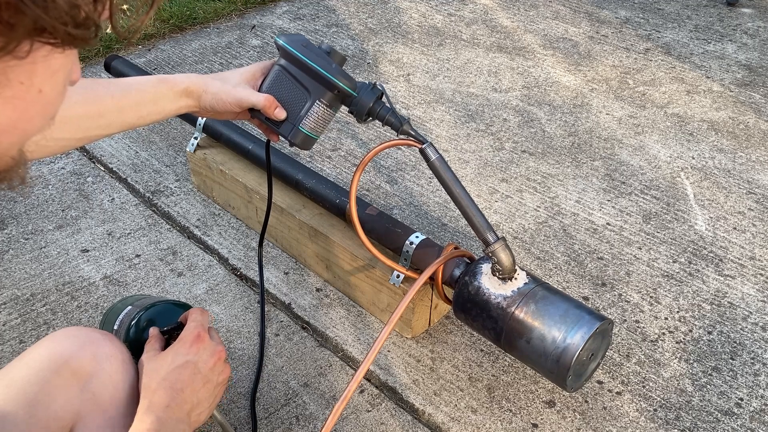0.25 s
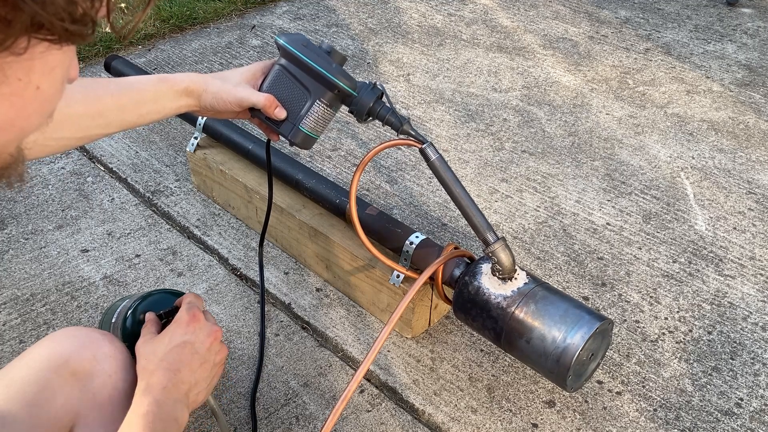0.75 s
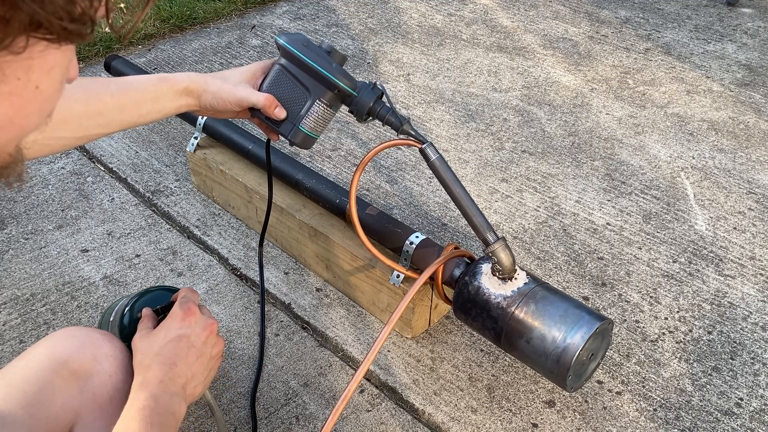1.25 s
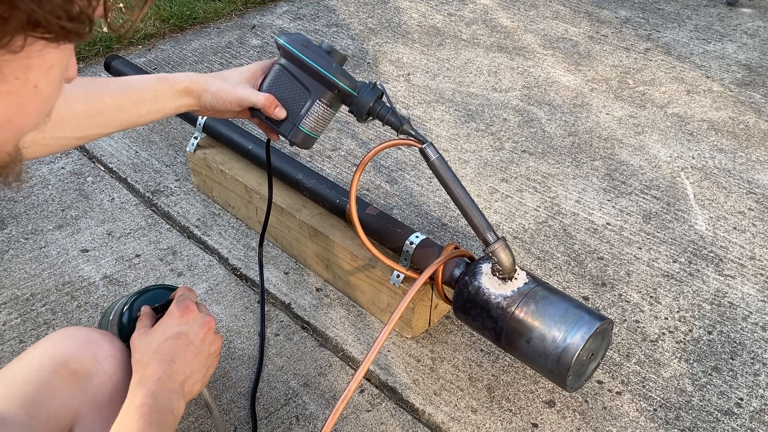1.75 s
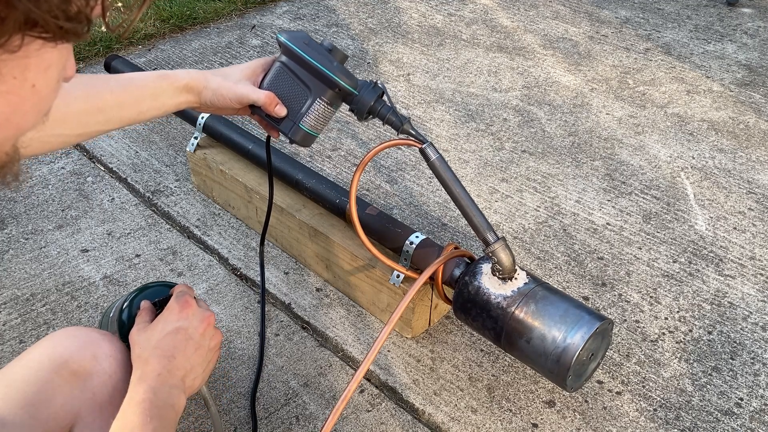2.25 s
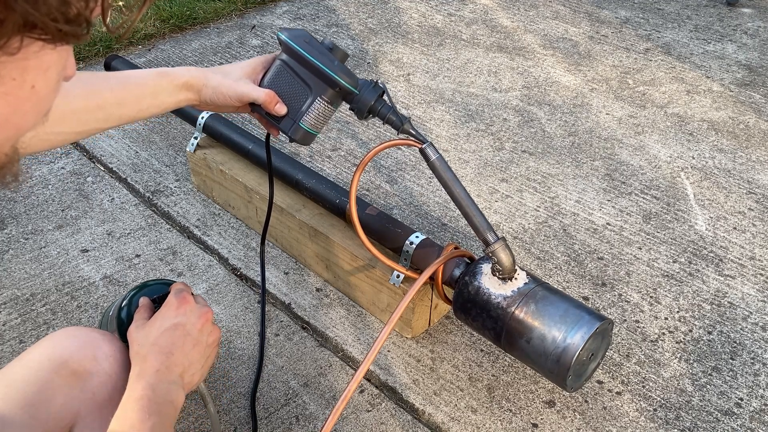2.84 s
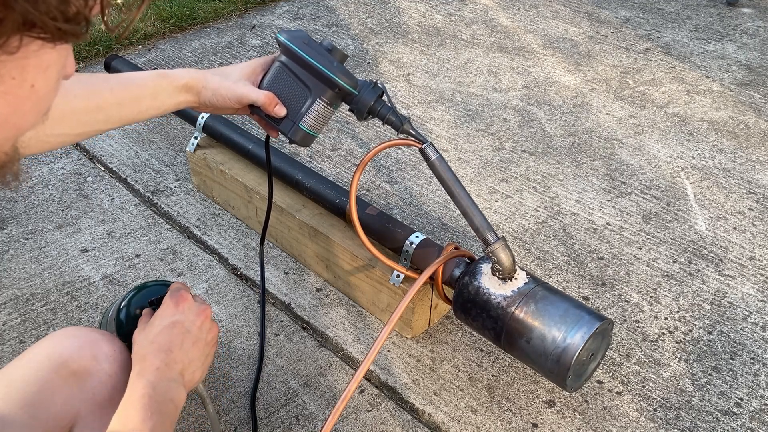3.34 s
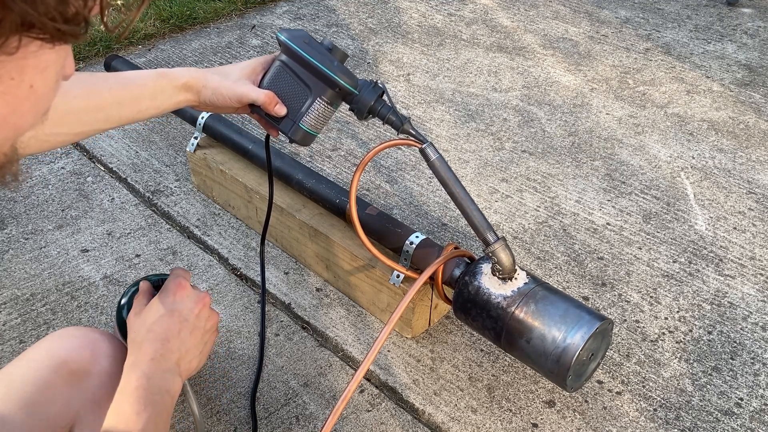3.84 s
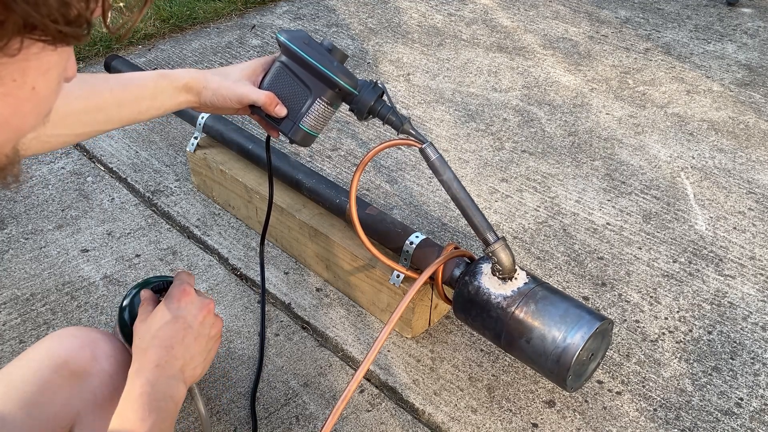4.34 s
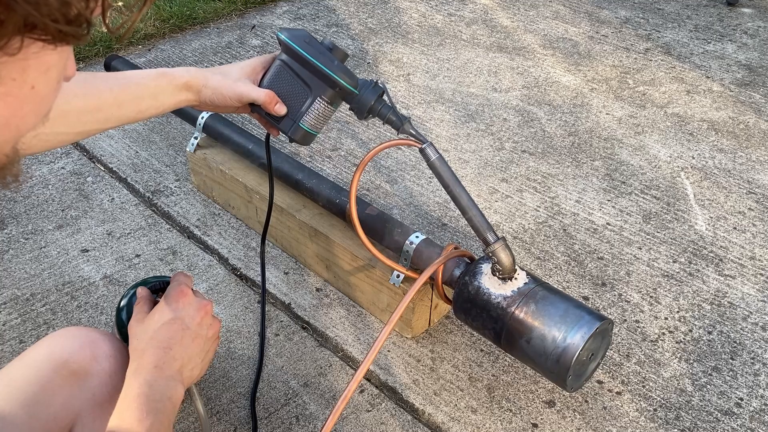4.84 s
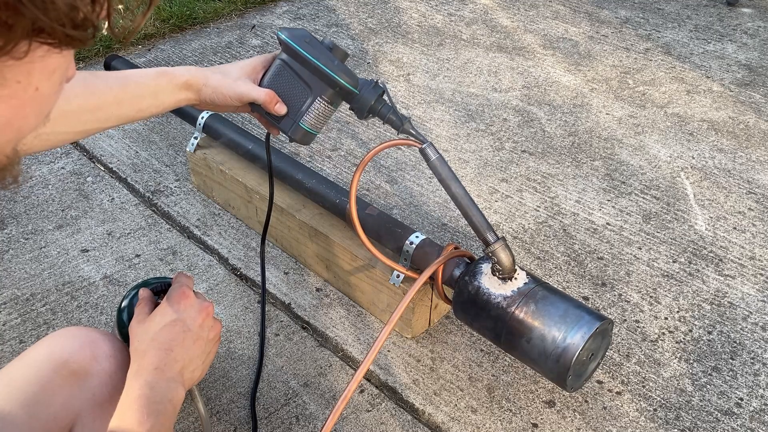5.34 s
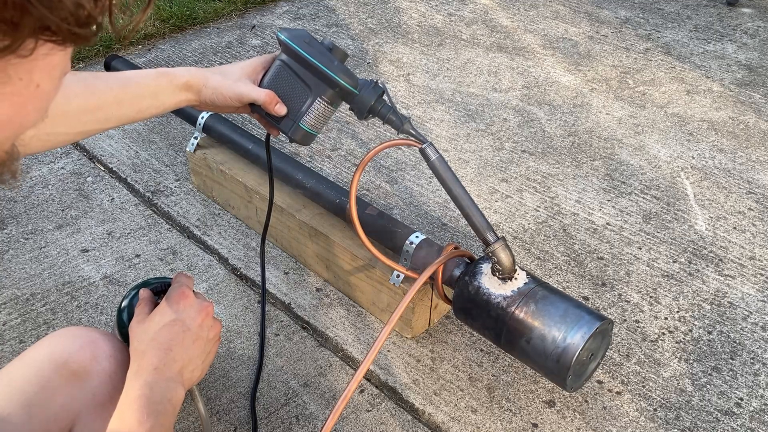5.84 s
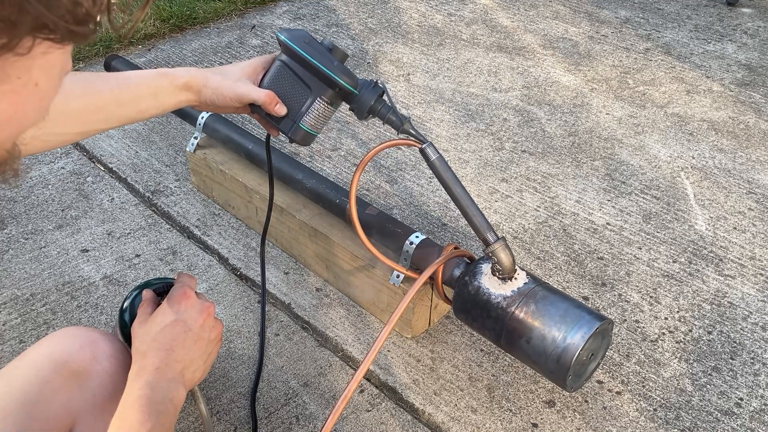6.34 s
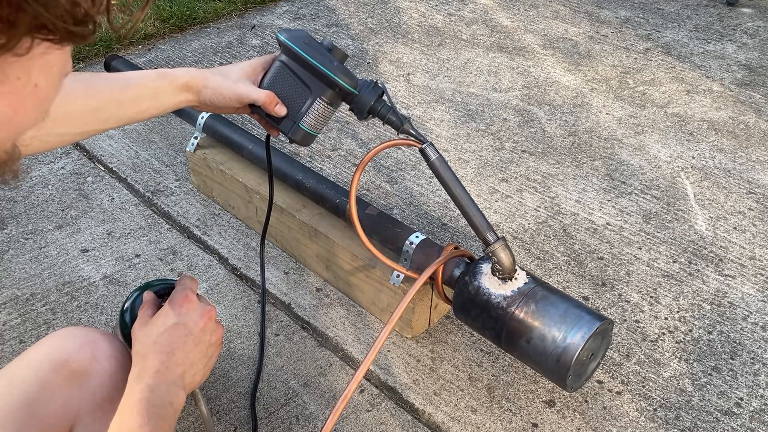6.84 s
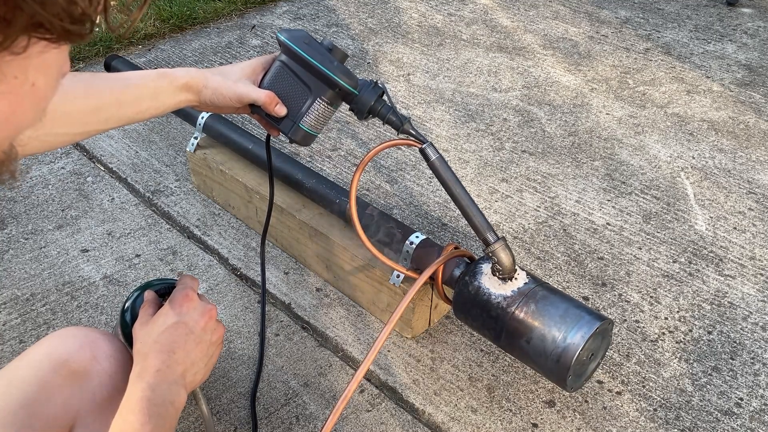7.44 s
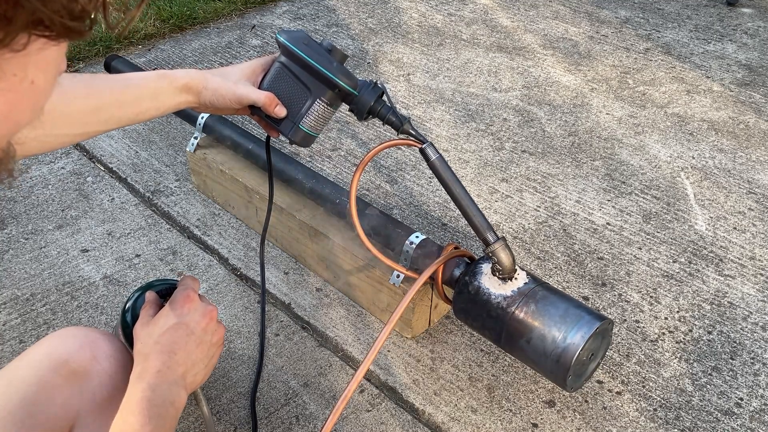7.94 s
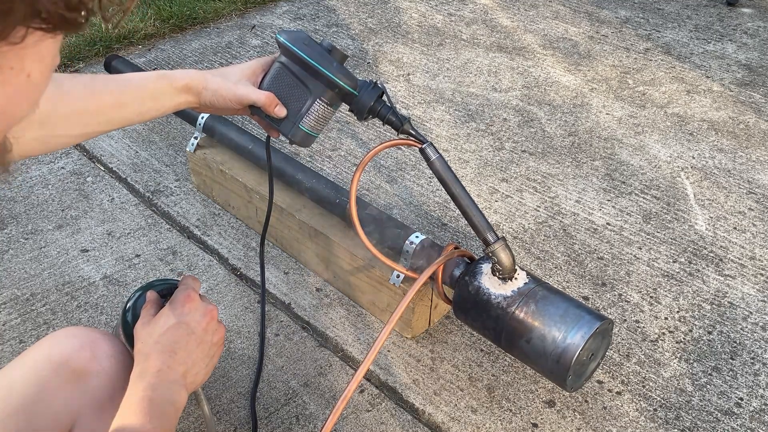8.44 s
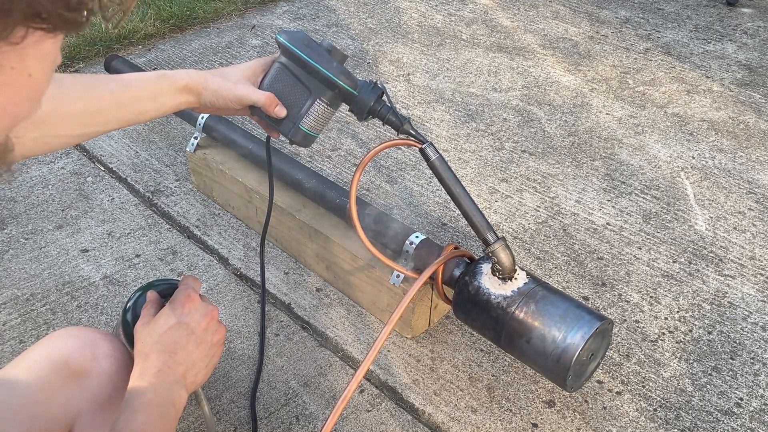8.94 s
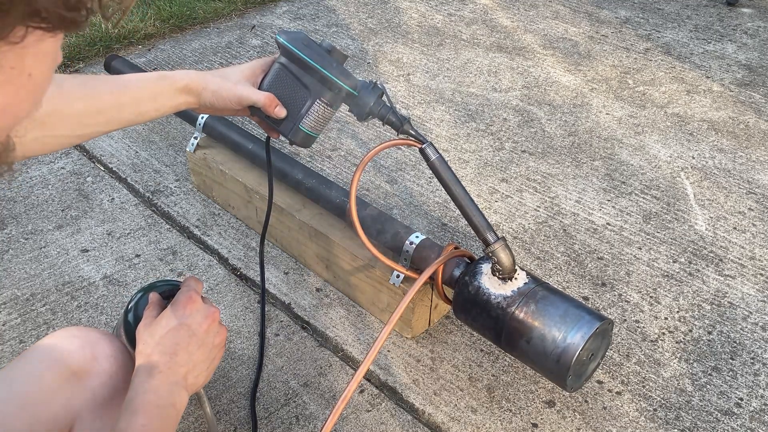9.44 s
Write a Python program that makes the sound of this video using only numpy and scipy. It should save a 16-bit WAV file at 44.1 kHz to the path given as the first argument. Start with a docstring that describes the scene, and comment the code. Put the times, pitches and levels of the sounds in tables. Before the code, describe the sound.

A homemade pulsejet chugs then jumps to a hard low buzz, stumbling and nearly dying, while an electric air pump whines steadily beside it.

```python
"""On a concrete drive, a homemade pulsejet runs while an electric air pump blows into its intake.
It chugs slowly, climbs to a hard buzz, nearly starves at three seconds, catches again and keeps stumbling.
Each cycle swings the air in the pipe, bangs, roars and spits hissing gas, all made from one shared rhythm.
The bangs and noises are pulses and random noise, shaped in pitch; the pump is a set of steady tones over
a rush of air."""
import sys
import numpy as np
from scipy import signal
from scipy.fft import rfft, irfft, next_fast_len
from scipy.io import wavfile

SR = 44100
rng = np.random.default_rng(int(sys.argv[2]) if len(sys.argv) > 2 else 0)


def transcribe(u):
    """Save the signal u as a 16-bit wav file named by the first command-line argument.

    u: samples, shape (n,) or (channels, n), limited to [-1, 1]; the rate is SR.
    q: integer samples, one column per channel.
    """
    v = np.clip(np.atleast_2d(u).T, -1, 1)
    q = np.round(v * 32767).astype(np.int16)
    wavfile.write(sys.argv[1], SR, q)


N = 427329
TIME = np.arange(N) / SR  # seconds
BINS = np.fft.rfftfreq(N, 1 / SR)  # Hz

# Likeness of the noise at the two microphone ports: (frequency [Hz], likeness [0-1])
PORT_LIKENESS = [(100, 0.88), (300, 1), (600, 0.43), (1400, 0.72), (2300, 0.24), (4400, 0.28), (5500, 1),
                 (6300, 0.17), (7500, 0.84), (9200, 1), (12000, 1), (15800, 1)]
# Phase between the ports: (frequency [Hz], how far left leads [rad])
PORT_PHASE = [(20, 0), (4200, -.3), (5400, -3.2), (6900, -6.28), (9100, -9.42), (11350, -12.57),
              (13650, -15.7), (15800, -18.85)]
# Balance of the whole scene: (frequency [Hz], left minus right [dB])
LEFT_RIGHT_BALANCE = [(60, -1.5), (120, 2.5), (240, -1.5), (480, 1.5), (950, 3.5), (1890, 1.5), (3770, 3.5),
                      (7520, 0), (15000, 0.0)]

# The pump holds nearly one speed: (time [s], blade tone [Hz], level [dB])
PUMP_SPEED = [(0, 3025, -35), (2, 3023, -36.5), (4, 3016, -36), (5.8, 3024, -35), (7.2, 3024, -37),
              (7.8, 3026, -36), (8.45, 3016, -40.5), (8.8, 3017, -36.5), (9.69, 3016, -35.5)]
# Pump tones, as multiples of the shaft speed: one column (order [tones per shaft turn])
SHAFT_ORDERS = [5, 6, 10, 12, 18, 20, 21, 24]
# Loudness of each of those tones, in the same order: (left [dB], right [dB])
SHAFT_TONE_LEVELS = [(0, 2), (-16, -12.5), (-12.5, -9), (-8.5, -9), (-12, -7), (-8, -8), (-16, -16),
                     (-22, -22)]
# Colour of the pump's air: (frequency [Hz], density [dB per Hz])
PUMP_AIR_COLOUR = [(100, -9), (400, -16), (800, 25.5), (1600, -24.5), (2400, 10), (3400, 14), (4800, 4),
                   (7000, 11.5), (9000, 11.5), (12000, -4), (15800, -24)]
BLADES = 5

# How hard the engine runs as the fuel is adjusted, before stumbles, flares and the mix:
# (time [s], pipe swing [dB], bang [dB], jet hiss [dB])
FIRING_LEVELS = [(0, -13.5, -18, -28.5), (1.02, -11, -17, -26.5), (1.09, -14, -17.5, -32.5),
                 (1.4, -17.4, -18, -31), (2.25, -18, -17.5, -30.5), (2.95, -21, -20.5, -36.5),
                 (3.13, -23, -23.5, -34.5), (3.56, -24.5, -25, -35.5), (3.94, -21, -23.5, -37),
                 (4.0, -17, -17.5, -26.5), (4.8, -17, -18, -30.5), (6.1, -17, -18.5, -29.5),
                 (6.5, -16.5, -18.5, -31.7), (7.6, -16, -18.3, -32.5), (8.7, -16.5, -19, -31),
                 (9.69, -17, -20, -32.5)]
# Basic firing rate, before sags and drift: (time [s], rate [firings per second])
FIRING_RATE = [(0, 75), (0.41, 79), (0.6, 74), (0.99, 75.5), (1.15, 92.8), (1.4, 95), (2.25, 99.5),
               (2.91, 98), (3.48, 93), (3.94, 94), (4.06, 102), (4.29, 93.5), (5.75, 96), (6.45, 94),
               (6.69, 91.5), (7.7, 93.5), (8.6, 92), (9.69, 90)]
# How unevenly the charge burns, before stumbles and drift: (time [s], roughness [0-1])
BURN_ROUGHNESS = [(0, 0.55), (1.05, 0.47), (1.2, 0.52), (1.35, 0.39), (2.0, 0.36), (2.15, 0.24),
                  (2.95, 0.39), (3.1, 0.77), (3.85, 0.84), (4.0, 0.2), (4.2, 0.33), (4.8, 0.48),
                  (5.9, 0.36), (6.7, 0.32), (7.4, 0.48), (7.9, 0.33), (9.69, .44)]
# The flame falters and catches again: (time of weakest point [s], depth [dB], half length [s])
STUMBLES = [(0.063, 13, 0.02), (0.144, 5.5, .018), (0.325, 12, .023), (0.526, 5, .017), (0.607, 3, .013),
            (0.787, 4.5, .011), (.958, 3.9, .017), (1.084, 6.1, .039), (1.207, 10, .017),
            (1.307, 4.5, 0.0097), (1.652, 7, .021), (1.981, 5, .018), (3.065, 6, .022), (3.204, 6.5, 0.031),
            (3.352, 5.5, .027), (3.43, 4.5, .014), (4.424, 4, 0.026), (4.787, 7, .022), (5.013, 2.5, .028),
            (5.406, 8.5, 0.037), (5.609, 6.5, .019), (5.734, 5, 0.0078), (6.881, 8, .03),
            (7.213, 3.5, .012), (7.394, 8.5, .037), (7.604, 4.5, .011), (8.183, 4.5, .019),
            (8.31, 5.5, .02), (8.642, 6.6, 0.033), (8.75, 7.5, .015), (9.24, 8, .016), (9.379, 4.6, .02),
            (9.684, 4, 0.027)]
# A rich charge flares up and drives the jet harder: (time [s], extra hiss [dB])
FLARES = [(.251, 3.5), (.463, 5), (.65, 3.5), (1.017, 2), (1.546, 2), (1.877, 5.5), (4.476, 5.5),
          (4.643, 3), (4.912, 4.1), (5.261, 6), (5.676, 3.1), (6.047, 5.5), (6.127, 0), (6.75, 3),
          (7.897, 3.9), (8.262, 4.5), (8.391, 5), (8.574, 3.3), (8.811, 4), (8.993, 4.5), (9.206, 6.5),
          (9.463, 4), (9.545, 4), (9.627, 4.9)]

# Resonances of the pipe, rung by bangs and flame: (frequency [Hz], width [Hz], strength [dB])
PIPE_RESONANCES = [(200, 43, -9.5), (306, 87, -2), (372.3, 21, -0.5), (629.5, 63, 1), (1038, 57, 5.5),
                   (1425, 100, -11)]
# Colour of the bangs: (frequency [Hz], density [dB per Hz])
BANG_COLOUR = [(60, -59.5), (125, -16), (190, 1.5), (290, 1.5), (380, -0.5), (470, -2.5), (570, -15),
               (680, -5.5), (850, -28.5), (1050, -22.5), (1500, -16.5), (2200, -29.5), (5000, -44)]
# Colour of the flame's roar: (frequency [Hz], density [dB per Hz])
ROAR_COLOUR = [(20, -55), (45, -42), (75, 8), (130, -2), (220, -1.5), (350, 4), (440, -0.5), (550, -3.5),
               (680, -3.5), (880, -14.5), (1500, -14.5), (2300, -35), (3700, -16.5), (6000, -54)]
# Colour of the starved flame: (frequency [Hz], density [dB per Hz])
STARVED_COLOUR = [(20, -31), (50, -14), (90, -5), (140, 4), (200, -5), (370, -4), (480, -17), (620, -15),
                  (750, -17.5), (1050, -21.5), (1500, -18.5), (2400, -30), (6000, -38.5)]
# Colour of the jet's hiss: (frequency [Hz], density [dB per Hz])
JET_COLOUR = [(500, -6.5), (1500, 2.5), (2400, -12.5), (3600, -4), (4600, -2.5), (5600, -3), (6500, -7),
              (7800, 2.5), (9200, 3), (11000, 1), (12500, -1), (14000, -4), (15800, -8)]
# Colour of the rasp at the pipe's mouth: (frequency [Hz], density [dB per Hz])
RASP_COLOUR = [(400, -9), (900, -8.5), (1150, -4), (1550, 1.5), (1950, -2), (2500, -4.5), (3700, -7.5),
               (5000, -14), (9000, -45)]
# Rasp compared with the bang level: (time [s], level [dB])
RASP_LEVEL = [(0, -16), (1.2, -16), (2.3, -13.5), (3.0, -13), (3.9, -10.5), (4.5, -17.5), (6.5, -15),
              (8, -16), (9.69, -18)]
# Late charges that go off with a pop: (time [s], relative strength [dB])
LATE_POPS = [(0.095, -16), (1.536, -13), (3.147, -17), (3.287, -13), (7.476, -10)]
# Sharp spits of burning fuel: (time [s], relative strength [dB])
FUEL_SPITS = [(3.0808, -25), (3.1263, -19), (3.1384, -22), (3.2156, -26), (3.286, -22), (3.3882, -20),
              (3.455, -21.5), (3.5299, -25), (3.6077, -19), (3.7359, -24), (3.768, -16), (3.8186, -22),
              (3.9454, -26)]
# Colour of a spit of fuel: (frequency [Hz], density [dB per Hz])
SPIT_COLOUR = [(300, -22), (900, -17), (1300, 1), (1700, 8), (2100, -3), (2600, -11), (3700, 0),
               (6000, -35)]

# What a stumble does besides weakening the bangs, for each dB of its depth
SWING_DIP_DB, HISS_DIP_DB, SAG_HZ, ROUGH_RISE = 1.4, 1.06, 0.9, 0.07
SWING_LAG_S, SAG_LAG_S = 0.0078, 0.014  # the air column dies away and slows a little after the burn
HISS_STRETCH, SAG_STRETCH = 1.09, 1.27  # hiss and rate take longer to recover
FLARE_S = 0.011  # half length of a flare
FLARE_SWING, FLARE_BANG = 0.47, 0.35  # shares of a flare that reach the swing and the bangs
# Chance changes in the firing: sizes, then how quickly they move
RATE_DRIFT_HZ, BURN_WAVER_DB, HISS_FLICKER_DB = 2.0, 0.61, 1.2
DRIFT_SPEED_HZ, WAVER_SPEED_HZ, FLICKER_SPEED_HZ = 8, 15, 24
# For each Hz of faster drift: harder bangs, less swing, a more even burn
BANG_DB_PER_HZ, SWING_DB_PER_HZ, ROUGH_PER_HZ = 0.19, 0.29, 0.015


def gain_of(db):
    """Turns decibels into a gain."""
    return 10 ** (np.asarray(db) / 20)


def evened(x):
    """Scales a sound to an average (rms) strength of 1."""
    return x / np.sqrt(np.mean(x ** 2) + 1e-20)


def read(points, hz=BINS):
    """Reads a frequency table at every bin, on a log-frequency axis."""
    table_hz, value = np.transpose(points)
    return np.interp(np.log(hz + 1), np.log(table_hz + 1), value)


def curves(rows):
    """Reads the columns of a time table at every sample."""
    s, *columns = np.transpose(rows)
    return [np.interp(TIME, s, column) for column in columns]


def wander(rate_hz):
    """Smooth random motion of rms 1, moving up to about the given rate."""
    size = next_fast_len(N, True)
    hz = np.fft.rfftfreq(size, 1 / SR)
    smoothed = rfft(rng.standard_normal(size)) / (1 + (hz / rate_hz) ** 4)
    return evened(irfft(smoothed, size)[:N])


def colour(x, db):
    """Filters a sound by a gain per bin in dB; minimum phase, so nothing rings before its cause."""
    log_gain = np.interp(abs(np.fft.fftfreq(8192, 1 / SR)), BINS, np.log(gain_of(db)))
    response = np.exp(np.conj(signal.hilbert(log_gain)))
    taps = np.fft.ifft(response).real[:4096]
    return signal.oaconvolve(x, taps)[:N]


def noise_pair(db, phase=0, surge=1):
    """Turbulence, surging at its source, then coloured, as the two ports hear it."""
    a, b = (rfft(colour(surge * white, db)) for white in rng.standard_normal((2, N)))
    same = np.clip(read(PORT_LIKENESS), 0, 1)
    left = a * np.exp(1j * phase)
    right = same * a + np.sqrt(1 - same ** 2) * b
    return evened(irfft(np.array([left, right]), N))


def yard(x, wet_db=-13, t60_s=0.077):
    """Adds scattered echoes off nearby walls, different at each port and fading 60 dB in t60_s."""
    t = np.arange(SR // 3) / SR
    sparse = rng.random((2, len(t))) < 0.03
    echoes = rng.standard_normal((2, len(t))) * sparse * (t > 0.004)
    echoes = echoes * gain_of(-60 * t / t60_s)
    echoes /= np.linalg.norm(echoes, axis=1, keepdims=True)
    return x + gain_of(wet_db) * signal.fftconvolve(x[None], echoes, axes=1)[:, :N]


def pump(waver_hz=1.601, flicker_db=1.0, air_db=-34, left_lead_turns=0.15):
    """The turning impeller makes tones at multiples of its shaft speed, over the rush of its air."""
    hz, level = curves(PUMP_SPEED)
    shaft_turns = np.cumsum(hz + waver_hz * wander(22.0)) / SR / BLADES
    lead = left_lead_turns * np.array([[1], [0]])
    whine = 0
    for order, ports_db in zip(SHAFT_ORDERS, SHAFT_TONE_LEVELS):
        tone_turns = order * shaft_turns % 1 + rng.random() + lead
        tone = np.sqrt(2) * np.sin(2 * np.pi * tone_turns)
        # Hot, moving air makes the higher tones fade in and out more
        fading = evened(gain_of(flicker_db * np.log(1 + order / BLADES) * wander(11)))
        whine = whine + gain_of(ports_db)[:, None] * tone * fading
    air = noise_pair(read(PUMP_AIR_COLOUR), read(PORT_PHASE))
    return gain_of(level) * whine + gain_of(air_db) * air


def swell(s, half_length):
    """A smooth bump of height 1 around one moment, at every 64th sample."""
    return np.exp(-0.5 * ((TIME[::64] - s) / half_length) ** 2)


def stumbling(lag_s=0, stretch=1):
    """Depth of the stumbles in dB, felt a little later or longer by some parts of the engine."""
    dips = sum(db * swell(s + lag_s, length * stretch) for s, db, length in STUMBLES)
    return np.interp(TIME, TIME[::64], dips)


def flaring():
    """Height of the flares in dB."""
    bumps = sum(db * swell(s, FLARE_S) for s, db in FLARES)
    return np.interp(TIME, TIME[::64], bumps)


def running():
    """Rate, roughness and levels: a stumble weakens, slows and roughens the firing; a flare lifts it."""
    swing_db, bang_db, hiss_db = curves(FIRING_LEVELS)
    dip, flare = stumbling(), flaring()
    waver = BURN_WAVER_DB * wander(WAVER_SPEED_HZ)
    drift = RATE_DRIFT_HZ * wander(DRIFT_SPEED_HZ)
    flicker = HISS_FLICKER_DB * wander(FLICKER_SPEED_HZ)

    hz = curves(FIRING_RATE)[0] - SAG_HZ * stumbling(SAG_LAG_S, SAG_STRETCH) + drift
    rough = curves(BURN_ROUGHNESS)[0] + ROUGH_RISE * dip - ROUGH_PER_HZ * drift
    rough = np.clip(rough, 0.01, 0.97)

    swing_db = swing_db - SWING_DIP_DB * stumbling(SWING_LAG_S) + FLARE_SWING * flare
    swing_db = swing_db + waver - SWING_DB_PER_HZ * drift
    bang_db = bang_db - dip + FLARE_BANG * flare + waver + BANG_DB_PER_HZ * drift
    hiss_db = hiss_db - HISS_DIP_DB * stumbling(stretch=HISS_STRETCH) + flare + waver + flicker
    return hz, rough, swing_db, bang_db, hiss_db


def pipe_db():
    """Gain in dB of the pipe's resonances above the plain sound."""
    peaks = sum(gain_of(db) / (1 + (2 * (BINS - hz) / width) ** 2) for hz, width, db in PIPE_RESONANCES)
    return 20 * np.log10(1 + peaks)


def per_cycle(turns, spread_db):
    """A random strength for each cycle."""
    strengths = gain_of(spread_db * np.clip(rng.standard_normal(4000), -2, 2))
    return strengths[np.floor(turns).astype(int) % 4000]


def gate(turns, at, width, spread_db):
    """One puff a cycle, centred on the share 'at' of the cycle; width is also a share."""
    shifted = turns - at + 0.5
    puff = np.exp(-0.5 * ((shifted % 1 - 0.5) / width) ** 2)
    return puff * per_cycle(shifted, spread_db)


def swing(turns, hz, rough, flutter_db=3, chug_hz=71, chug_width_hz=18, chug_db=-2):
    """The air column swings nearly as a sine; uneven burns stir the slow chug, which beats with the buzz."""
    strength = gain_of(flutter_db * rough * wander(54))
    chug_colour = -20 * np.log10(1 + (2 * (BINS - chug_hz) / chug_width_hz) ** 2)
    stirred = evened(colour(rng.standard_normal(N), chug_colour))
    fast = np.interp(hz, [78, 88], [0.15, 1])  # more stirring at faster firing
    column = np.sqrt(2) * np.cos(2 * np.pi * turns) * strength
    return evened(column + gain_of(chug_db) * fast * rough * stirred)


def bangs(turns, rough, at=0.37, spread_db=4.5):
    """One pressure pulse a cycle rings the pipe; an uneven burn varies its moment and strength."""
    count = np.floor(turns - at + 0.035 * rough * wander(60))
    fired = np.diff(np.maximum.accumulate(count), prepend=count[0])  # 1 where a new cycle fires
    pulses = fired * per_cycle(turns, spread_db) ** rough
    return evened(colour(pulses, read(BANG_COLOUR) + pipe_db()))


def roar(turns, starved, steady=0.44):
    """Flame noise surges twice a cycle; a starved flame flutters low and does not ring the pipe."""
    first = gate(turns, at=0.777, width=0.1, spread_db=3.0)
    second = gate(turns, at=0.11, width=0.16, spread_db=0.0)
    fed = noise_pair(read(ROAR_COLOUR) + pipe_db(), surge=steady + first + second)
    flutter = noise_pair(read(STARVED_COLOUR), surge=gain_of(2.7 * wander(107)))
    return np.sqrt(1 - starved) * fed + np.sqrt(starved) * flutter


def rasp(turns, steady=0.17, grit_db=3.0):
    """Gas tears at the pipe's mouth, once blown out and once sucked back in each cycle."""
    blown = gate(turns, at=0.76, width=0.075, spread_db=2.8)
    sucked = 0.8 * gate(turns, at=0.2, width=0.075, spread_db=2.8)
    grit = gain_of(grit_db * wander(550))
    return noise_pair(read(RASP_COLOUR) + pipe_db(), surge=(steady + blown + sucked) * grit)


def jet(turns, hz, steady=0.37, crackle_db=2.4):
    """A crackling spit of gas each cycle; in the slow chug it comes later in the cycle."""
    late = np.interp(hz, [78, 86], [0.37, 0])  # share of a cycle
    spit = steady + gate(turns - late, at=0.96, width=0.11, spread_db=2.3)
    crackle = gain_of(crackle_db * wander(1500))
    return noise_pair(read(JET_COLOUR), read(PORT_PHASE), spit * crackle)


def bursts(rows, spectrum, push_s, puff, decay_s, level_db):
    """Each stray charge is a short push of pressure with a fading puff of flame noise."""
    out = np.zeros(N)
    t = np.arange(SR // 20) / SR
    for s, db in rows:
        push = (1 - t / push_s) * np.exp(-t / push_s)
        flame = puff * rng.standard_normal(len(t)) * np.exp(-t / decay_s)
        out[round(s * SR):][:len(t)] += gain_of(db) * (push + flame)
    return gain_of(level_db) * colour(out, read(spectrum))


def pops():
    """Deep pops of late charges and bright spits of fuel."""
    deep = bursts(LATE_POPS, ROAR_COLOUR, push_s=0.001, puff=0.35, decay_s=0.005, level_db=11)
    bright = bursts(FUEL_SPITS, SPIT_COLOUR, push_s=0.00015, puff=0.55, decay_s=0.0025, level_db=8)
    return deep + bright


def pulsejet(bang_mix_db=1, roar_mix_db=-1, hiss_mix_db=3.5):
    """One firing cycle drives swing, bangs, roar, rasp and jet; an uneven burn trades bangs for roar."""
    hz, rough, swing_db, bang_db, hiss_db = running()
    starved = np.clip((rough - 0.55) / 0.156, 0, 1)  # a very rough burn counts as starved
    turns = np.cumsum(hz) / SR + 0.05 * rough * wander(35)  # cycles so far, with uneven timing

    low = gain_of(swing_db - 2.8 * starved) * swing(turns, hz, rough)
    buzz = gain_of(bang_db + bang_mix_db - 3 * starved) * np.sqrt(1 - rough) * bangs(turns, rough)
    flame = gain_of(bang_db + roar_mix_db + 3.3 * starved) * np.sqrt(rough) * roar(turns, starved)
    mouth = gain_of(bang_db + curves(RASP_LEVEL)[0] - 5.0 * starved) * rasp(turns)
    gas = gain_of(hiss_db + hiss_mix_db) * np.sqrt(1 - rough ** 4) * jet(turns, hz)
    return low + flame + gas + mouth + yard(buzz + pops())


def scene():
    """Pump and engine together, balanced between left and right at each frequency."""
    balance_db = np.array([[0.5], [-0.5]]) * read(LEFT_RIGHT_BALANCE)
    return irfft(rfft(pulsejet() + pump()) * gain_of(balance_db), N)


def record(dry):
    """The microphone sheds the deepest bass and rounds the highest peaks; then the top treble is cut."""
    bass_cut = signal.butter(4, 49, "highpass", fs=SR, output="sos")
    lean = signal.sosfilt(bass_cut, dry)
    rounded = lean / (1 + (lean / 0.87) ** 12) ** (1 / 12)
    treble_cut = signal.firwin(511, 15900, window=("kaiser", 9), fs=SR)
    return signal.oaconvolve(rounded, treble_cut[None], "same")


dry = scene()
out = record(dry)
transcribe(out)
```